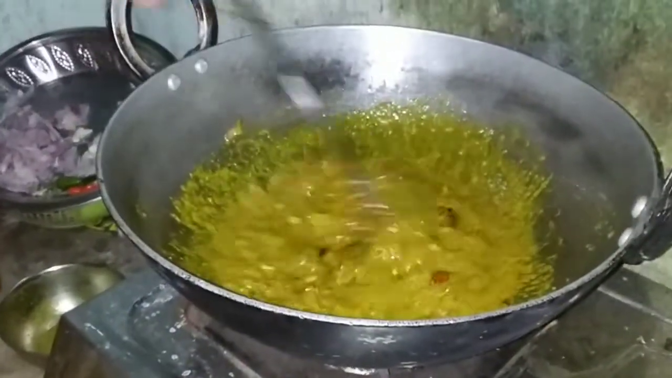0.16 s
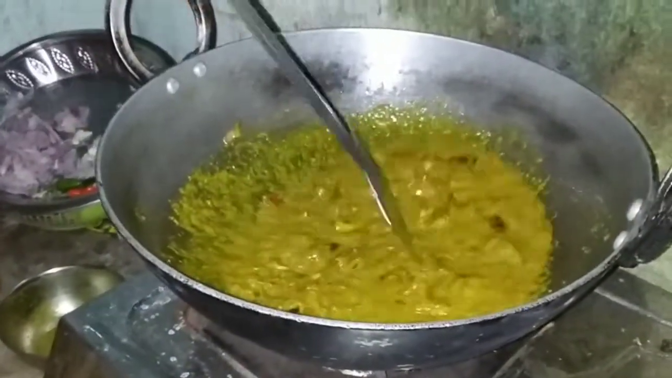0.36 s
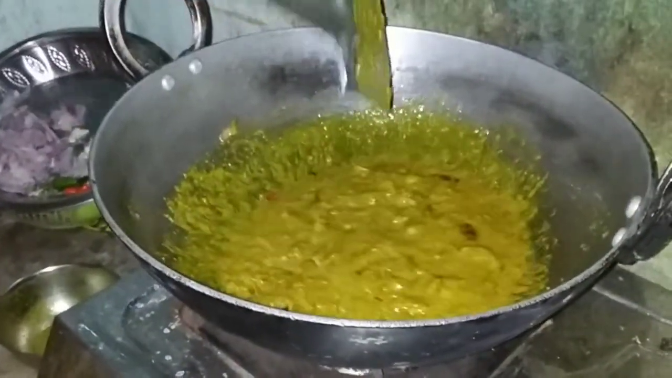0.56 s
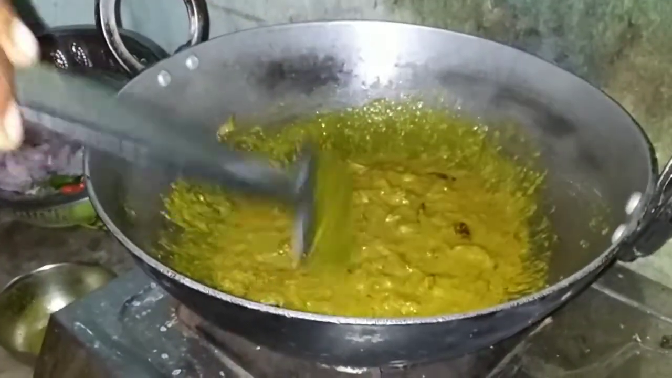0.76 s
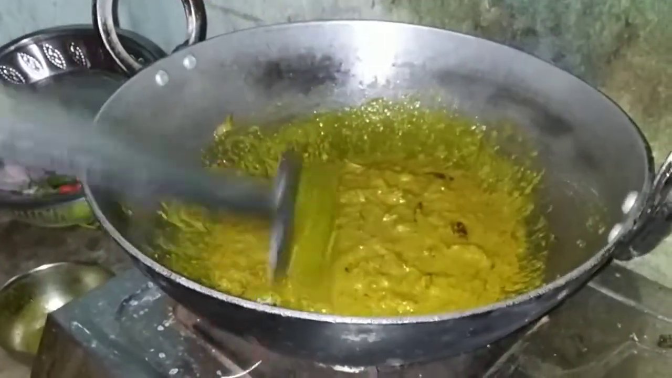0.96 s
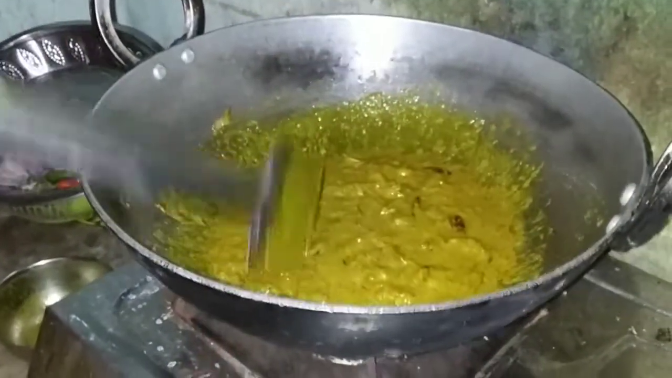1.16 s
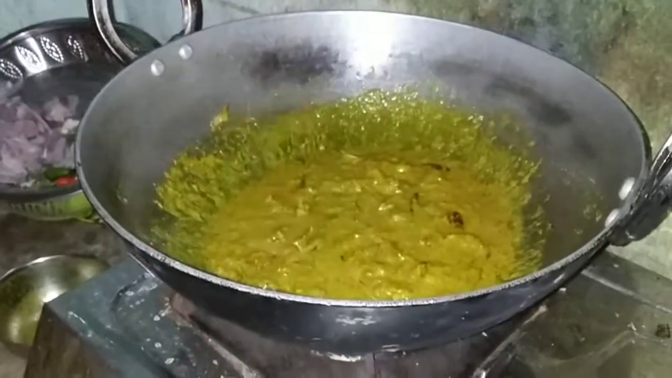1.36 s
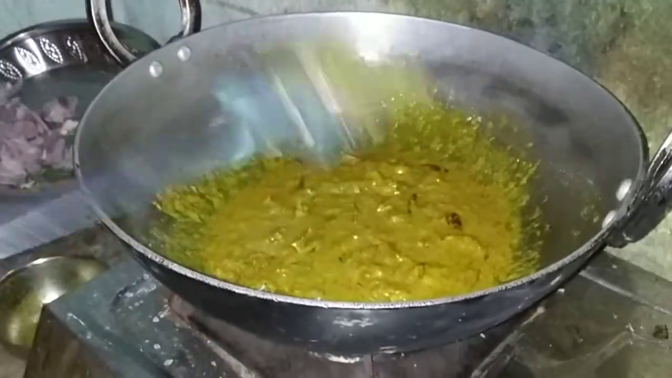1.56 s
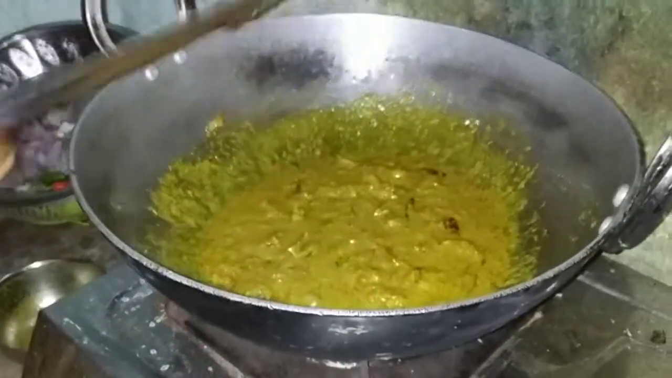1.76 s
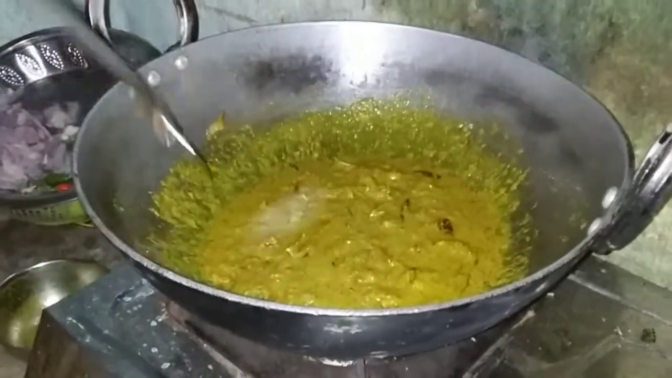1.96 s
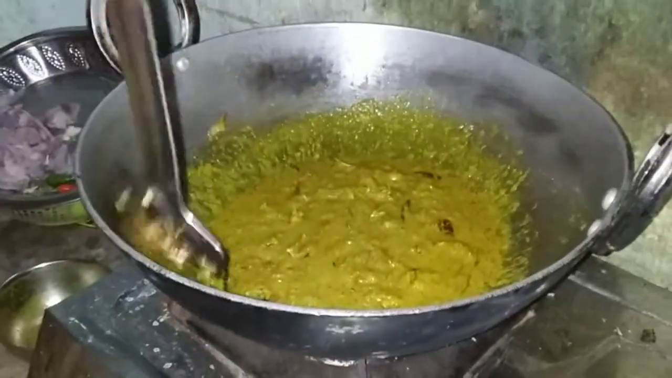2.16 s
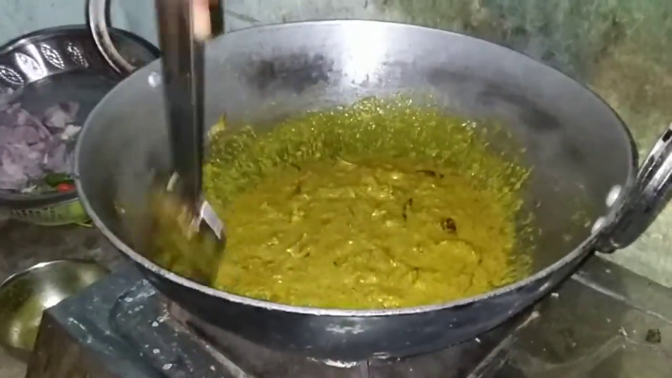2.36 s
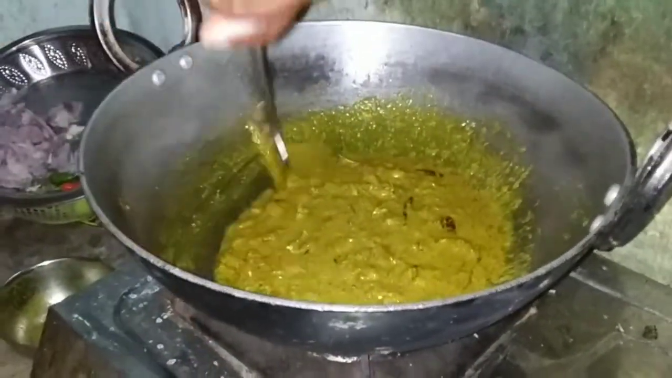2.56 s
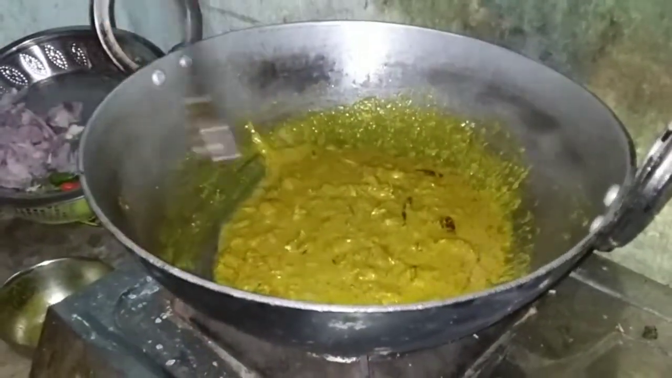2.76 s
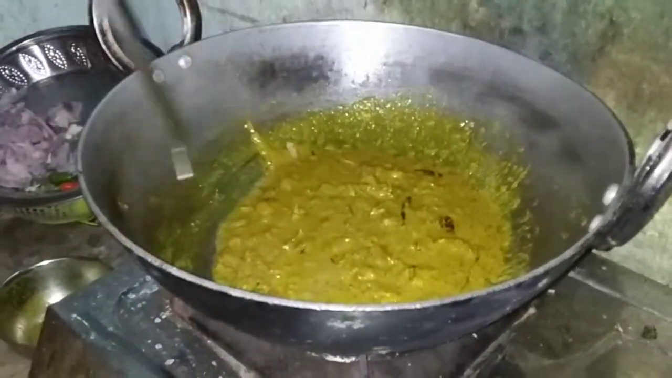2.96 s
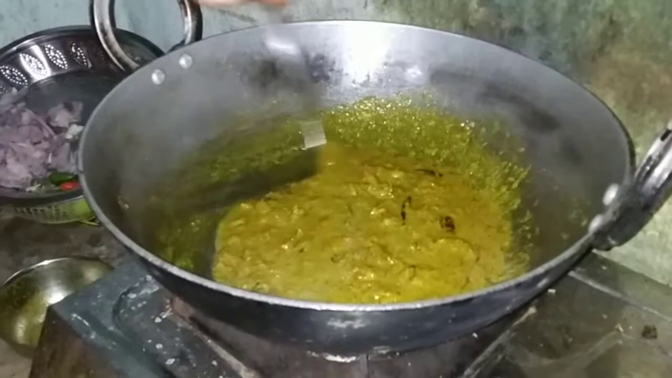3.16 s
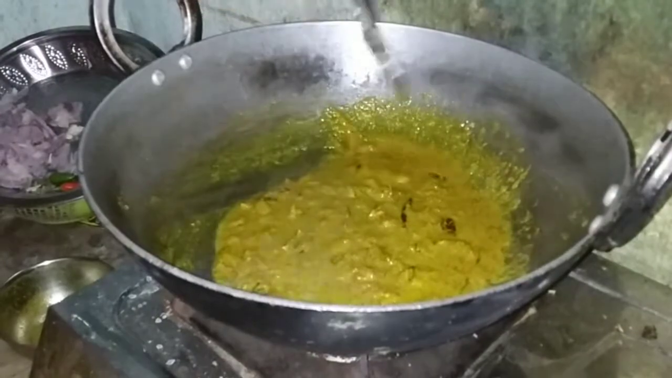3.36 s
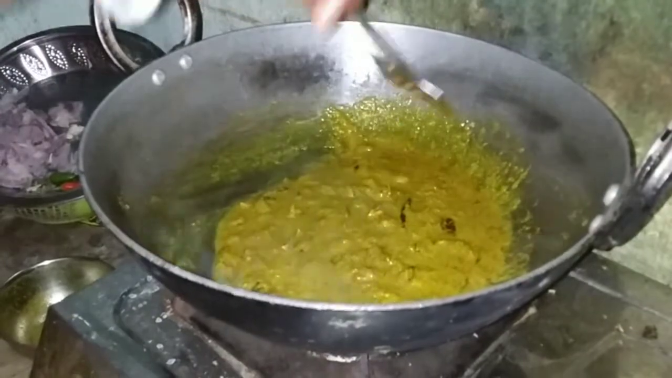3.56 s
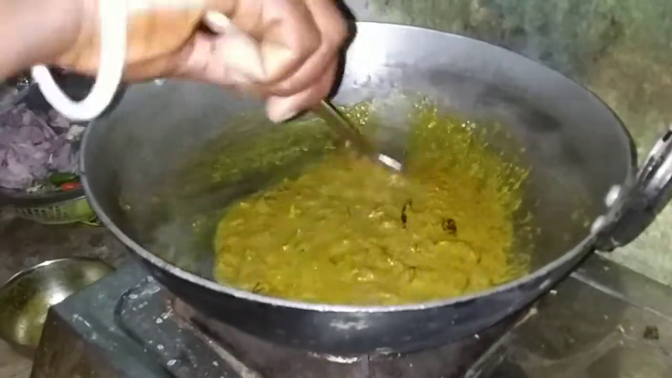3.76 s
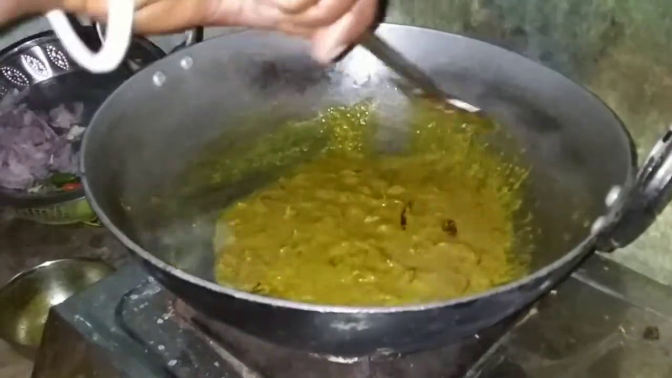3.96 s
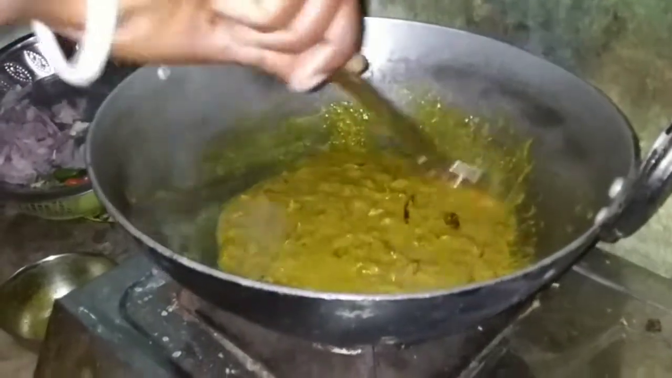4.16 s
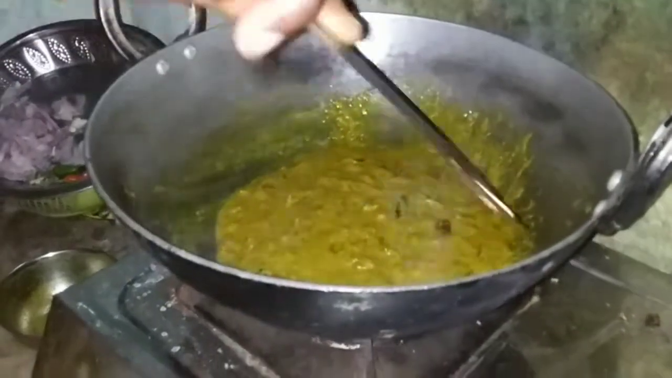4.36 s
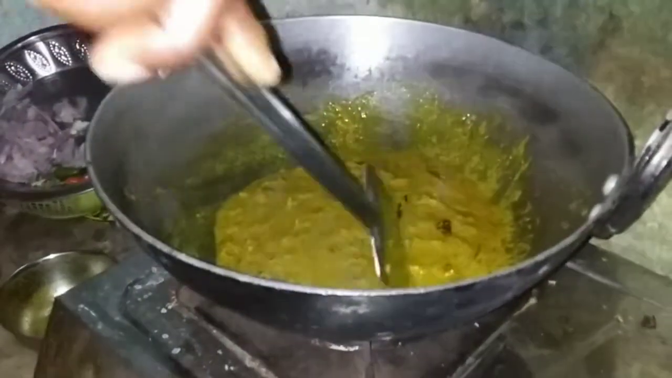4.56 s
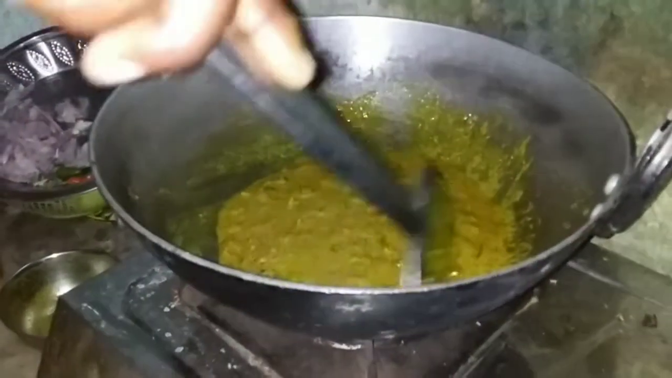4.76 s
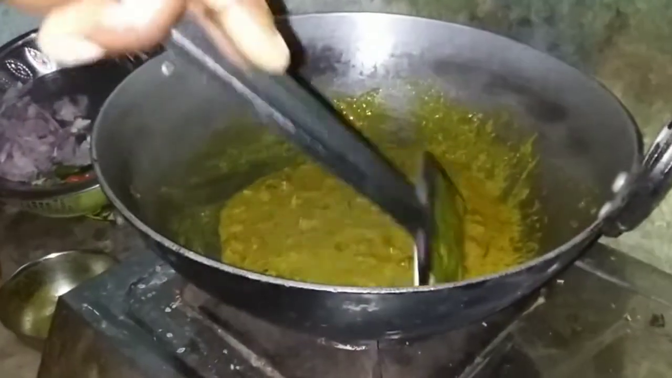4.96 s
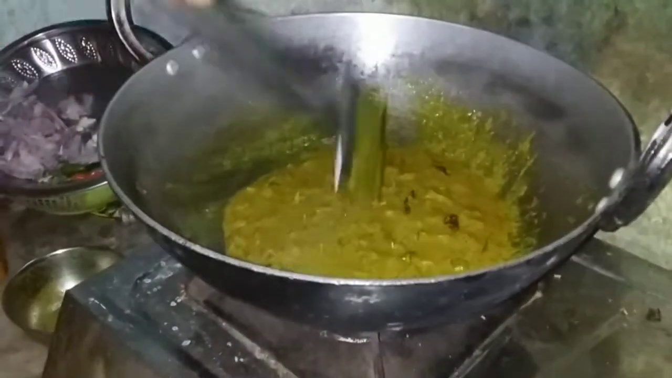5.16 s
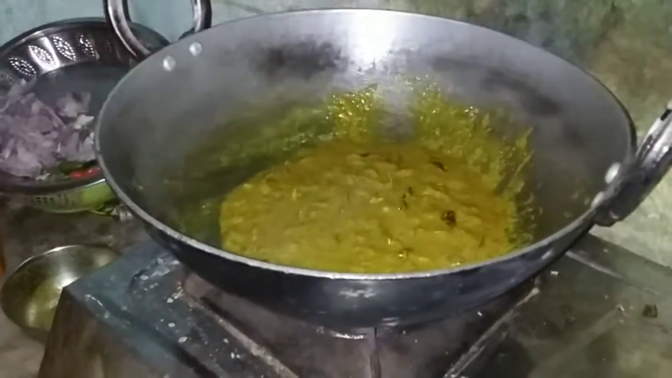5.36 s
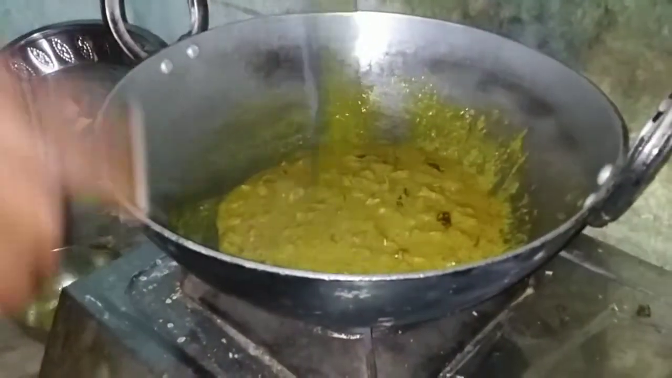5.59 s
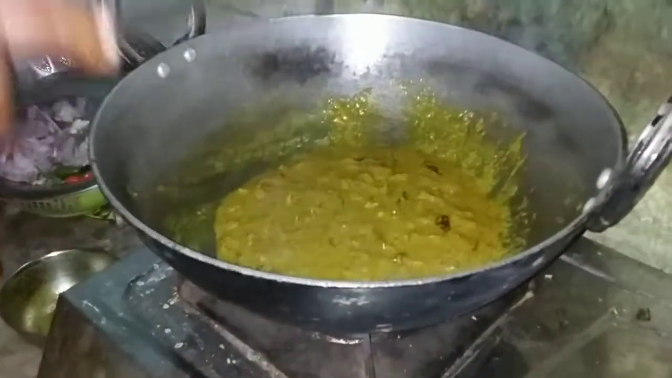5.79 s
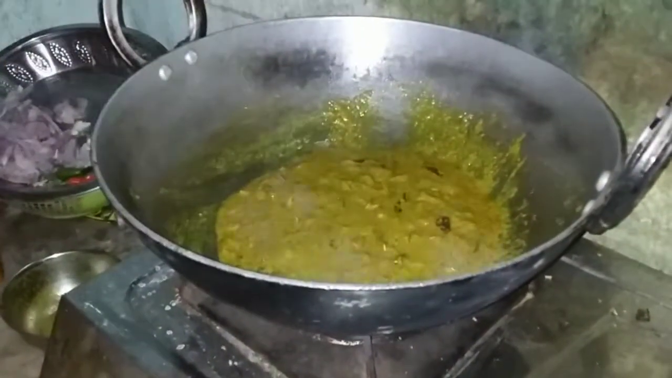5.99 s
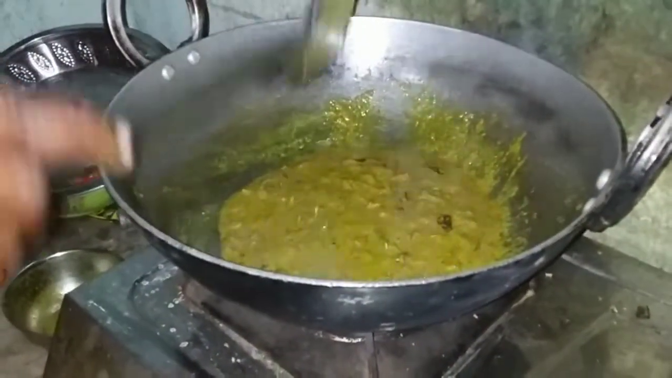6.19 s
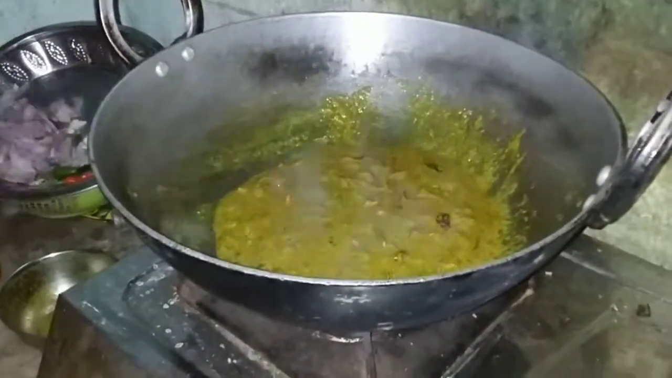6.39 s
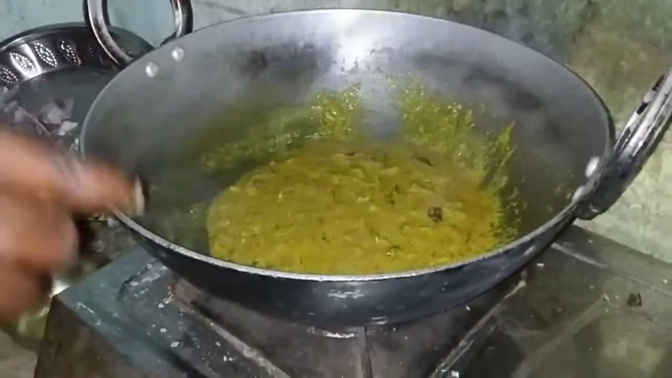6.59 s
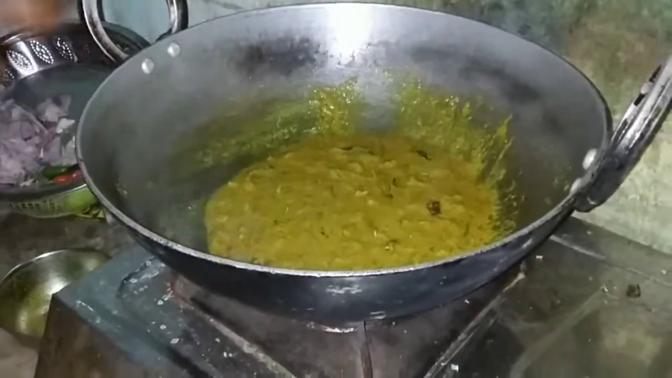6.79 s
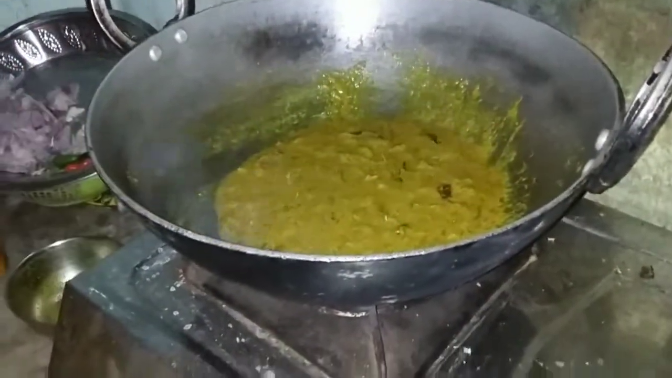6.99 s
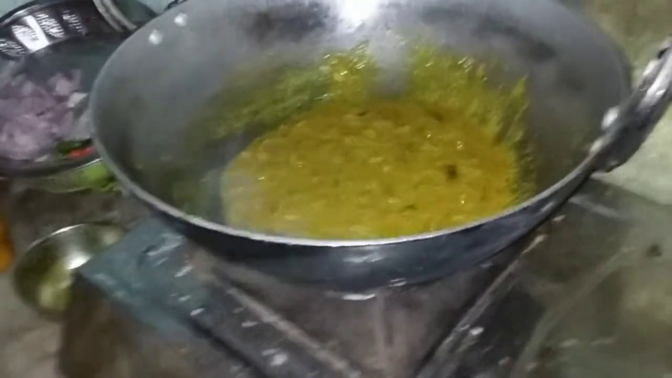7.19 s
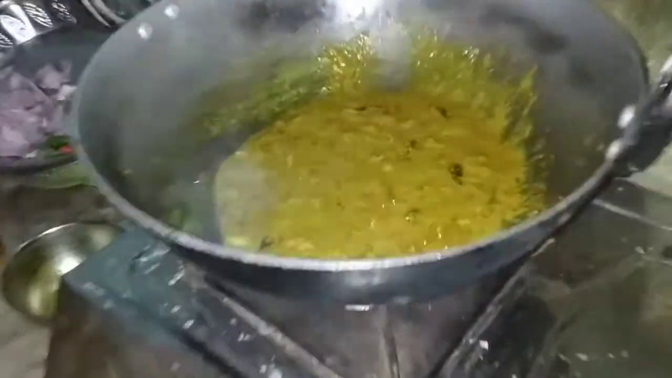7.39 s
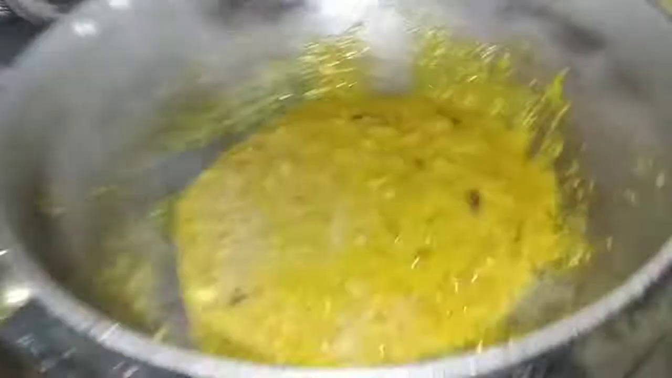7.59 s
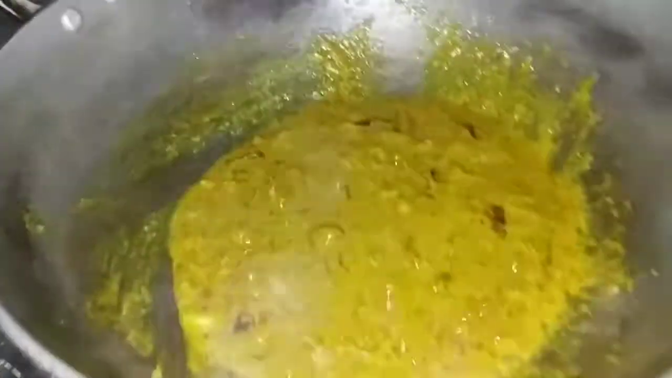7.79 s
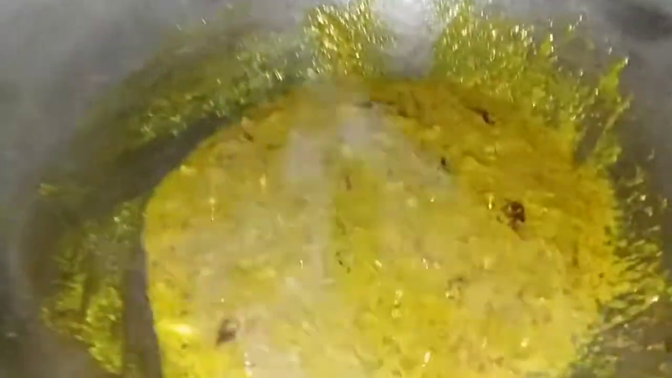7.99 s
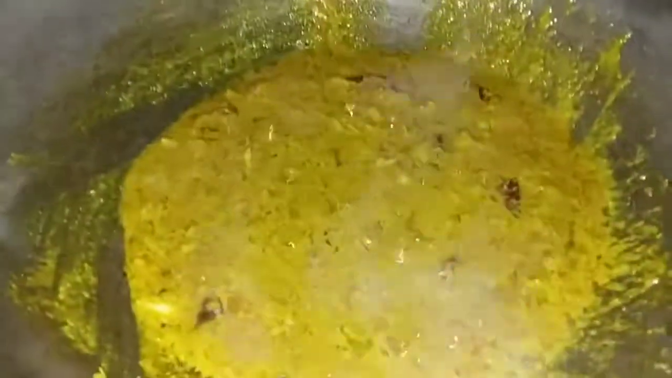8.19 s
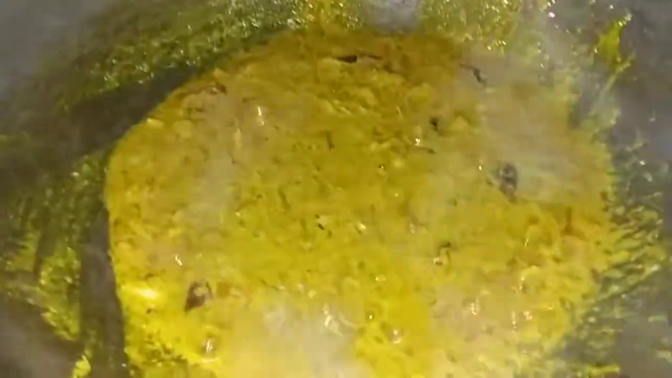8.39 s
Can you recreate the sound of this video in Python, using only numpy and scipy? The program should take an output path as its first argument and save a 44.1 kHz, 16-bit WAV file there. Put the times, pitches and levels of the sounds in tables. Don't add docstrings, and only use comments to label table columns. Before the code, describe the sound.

A close, dry kitchen sound with very little room echo. A low burner rumble flutters throughout, slightly stronger at first, with a thin distant motor hum and quiet steam hiss. A high oil sizzle pops at 0.1 s. A steel spatula strikes the pan wall loudly at 0.7, 0.85 and 1.05 s, each knock trailing a brief gritty scrape and slight ring; wet lumps slap around 1.1-1.3 s. Flatter landings at 2.15 and 2.8 s lead into longer scrapes, the first swelling late. A duller, heavier rim knock comes at 3.55 s, then strokes at 4.05, 4.35, 4.7 (very loud) and 4.95 s. From 5.1 s stirring stops: tiny sharp oil ticks, hollow bubble plops and dry paste snaps multiply, with a loud spit at 5.6 s. From 7.5 s the simmer and hiss swell closer until the end at 8.4 s, with low handling thumps around 8.14 and 8.34 s.

```python
import sys
import numpy as np
from scipy import signal
from scipy.fft import rfft, irfft
from scipy.io import wavfile
from scipy.ndimage import uniform_filter1d

SR = 44100
rng = np.random.default_rng(int(sys.argv[2]) if len(sys.argv) > 2 else 0)


def digitize_waveform(pressure):
    field = np.atleast_2d(pressure).T
    bounded = np.clip(field, -1, 1)
    quanta = np.round(bounded * 32767).astype(np.int16)
    wavfile.write(sys.argv[1], SR, quanta)


def gain_from_db(level_db):
    decades = np.asarray(level_db, float) / 20
    return 10 ** decades


N = 372204
TIME = np.arange(N) / SR
FREQ = np.maximum(np.fft.rfftfreq(N, 1 / SR), 1)

# (frequency [Hz], level [dB])
BURNER_COLOUR = [(9, -43.5), (15, 3), (32, -5), (46, -2.5), (54, -4), (102, -14), (146, -16), (178, -31.5),
                 (200, -17), (260, -42.5), (440, -120)]
# (frequency [Hz], width [Hz], level [dB])
MOTOR_HUM = [(612.7, 8.2, -2), (1628, 43, -6)]
# (frequency [Hz], balance [dB])
PORT_BALANCE = [(60, 1), (110, -0.5), (200, 0), (380, 0.5), (700, -1), (1290, 4.5), (2380, 5), (4400, 0.5),
                (8120, -4.5), (15000, 14.5)]
# (frequency [Hz], likeness [0-1])
PORT_LIKENESS = [(60, 0.94), (180, 0.87), (350, 0.9), (700, 0.6), (1400, 0.1), (3000, 0), (15000, 0.11)]

# (time [s], level [dB], oil sputter [dB])
SIMMER = [(0, -54, -1), (.46, -59, 1.5), (.62, -57, -4.5), (1.42, -58, 9), (1.61, -58.5, -2),
          (2.1, -55.5, -4.5), (2.6, -50.5, -2), (2.78, -54.5, 2), (3.3, -51.5, 2.5), (3.45, -54.5, -1),
          (3.85, -52.5, 1.5), (4.6, -51, -2.5), (5.16, -52, -2.5), (5.5, -49.5, -7), (6.13, -50.5, -2.5),
          (7.5, -48, -1), (7.85, -45.5, -0.5), (8.44, -43.5, -1.5)]
SIMMER_EDGES_HZ = [110, 700, 4000, 9000, 16500]
# (frequency [Hz], level per Hz [dB])
STEAM_COLOUR = [(59, -27.5), (100, -3), (427, -1.5), (602, -5), (684, -15.5), (903, -14.5), (1350, -15),
                (1610, -15), (1950, -15.5), (2520, -17), (5320, -18.5), (9070, -18.5), (12800, -19),
                (15500, -28.5), (16500, -59.5)]
# (level at a simmer of -53 [dB], follows level [dB/dB], follows sputter [dB/dB])
SIMMER_ANSWER = [(-58, 1, .01), (-58, 1, .01), (-62.5, 1, 0.35), (-59, 1, 0.74)]

# (time [s], peak [dB], pitch [Hz], left minus right [dB])
OIL_SPITS = [(5.1572, -36, 13100, 7.0), (5.1981, -41, 11800, 4), (5.3193, -42, 11600, 4.0),
             (5.3742, -47, 12800, 4), (5.5318, -51, 14200, 1), (5.5767, -27.5, 11100, 11),
             (5.5782, -25.5, 10900, 1.5), (5.7065, -38, 12700, 5), (5.7424, -35, 13600, 5),
             (5.9274, -32, 9570, 6), (5.9409, -30, 11600, 8), (6.0592, -40, 11000, 7.0),
             (6.1105, -40, 12000, 6.0), (6.2472, -24, 11100, 1), (6.3405, -36, 12500, 3),
             (6.4692, -34, 10900, 2), (6.4937, -34, 12800, 5), (6.6214, -42, 14700, 1),
             (6.6548, -36, 12700, 6.5), (6.7286, -45, 13100, 0), (6.8274, -32, 11700, 11),
             (6.9676, -37, 12300, 5.5), (7.0674, -39, 12600, 2), (7.1866, -32.5, 11600, 5),
             (7.3422, -46, 13500, 0), (7.5193, -35, 10500, 3), (7.5358, -35, 13200, 1),
             (7.5797, -26, 10400, -5), (7.6181, -27, 8000, 1), (7.655, -31, 9000, 5.5),
             (7.7787, -33, 9510, 8), (7.8745, -29, 9900, 7.0), (7.886, -30, 13200, 10),
             (7.9469, -29, 13000, 6.0), (8.0526, -48, 10100, -4), (8.2582, -28, 13300, 8),
             (8.346, -30, 10900, 0),
             (0.0094, -46, 11400, 8), (0.2314, -48, 12100, 5.0), (0.3034, -38, 13900, 1),
               (0.4384, -45, 12200, 9), (0.795, -22, 10900, -2), (1.995, -36, 7400, 8),
               (2.732, -34, 11100, -2), (3.2853, -39, 12700, 2), (3.3283, -27, 11550, 2),
               (3.364, -26.5, 10300, -2), (3.829, -45, 11200, 22)]
# (time [s], peak [dB], pitch [Hz], left minus right [dB])
PLOPS = [(5.6163, -30, 1820, 0), (5.7627, -36, 1740, -4), (5.937, -38, 2880, -1), (6.167, -31.5, 1740, 4),
         (6.4666, -39, 2300, 8), (6.507, -40.5, 1870, 12), (6.598, -37, 1780, 6.5), (6.815, -36, 2550, -3),
         (6.8889, -43, 2270, -5), (6.9933, -40, 1640, 0), (7.0794, -35.5, 3400, -3), (7.2725, -43, 2180, 0),
         (7.3076, -36, 2920, 7), (7.4097, -35.5, 1840, 1), (7.5359, -39.5, 2860, -14),
         (7.6197, -37, 1840, 0), (7.6598, -29.5, 1680, 0), (7.726, -38, 1740, 3.5), (7.7739, -35, 1740, -5),
         (7.8706, -36, 2440, 5), (8.0308, -37, 1740, 6), (8.1001, -48, 1830, -6), (8.284, -36, 1110, -6),
         (8.4099, -33, 2630, -1)]
# (time [s], peak [dB], pitch [Hz], left minus right [dB])
SINGING_DROPS = [
    (0.119, -23, 11100, -1),
    (5.579, -24.5, 10640, 4),
    (5.94, -35, 11640, 3.5),
    (6.248, -29, 10800, 9),
]
# (time [s], peak [dB], pitch [Hz], left minus right [dB])
SPLATS = [(1.1344, -25, 1380, 11), (1.1967, -28.5, 3100, 9), (1.225, -38, 1210, 1), (1.2476, -37, 3000, 9),
          (1.272, -35.5, 1100, 3), (2.7544, -59, 1580, 4), (3.2116, -37, 1620, -8), (4.6653, -39, 1640, -1),
          (5.2794, -45, 1210, 2.5), (6.6548, -33.5, 7350, -12), (7.8171, -30.5, 2750, 7.5),
          (8.0606, -32, 2680, 11)]
# (time [s], peak [dB], pitch [Hz], left minus right [dB])
SNAPS = [(5.1527, -34, 5790, 6), (5.3742, -32, 2640, 9), (5.7634, -26, 1850, 14), (6.1354, -32, 3390, 8),
         (6.6544, -35, 6000, 2.0), (6.674, -29.5, 1490, 2), (6.995, -29, 1860, 9), (7.0788, -30, 3530, 4),
         (7.234, -23.5, 2520, 9.5), (7.281, -32, 1710, -5), (7.5128, -34, 3600, 5), (7.5367, -28, 2860, 6),
         (7.6879, -24, 2930, 5), (7.774, -34, 1880, 3), (7.816, -40, 2870, 3), (8.0143, -25, 1680, -6),
         (8.0586, -40, 3160, -4), (8.2227, -33, 2480, -6)]
# (time [s], peak [dB], pitch [Hz], left minus right [dB])
BUMPS = [
    (8.138, -21.5, 233, -4.5),
    (8.147, -25, 149, -1),
    (8.338, -24, 303, -2),
    (8.351, -27, 318, -2),
]

# (time [s], peak [dB], body against treble [dB],
# 2-4.5 kHz against treble [dB], rise [s])
KNOCKS = [
    (0.665, -3.5, -2, -12, 0.00026),
    (0.853, -1.5, -4, -6.5, 0.0008),
    (1.051, -3, -7, -9.5, 0.00033),
    (2.1467, -6.5, -17, -11, 0.012),
    (2.814, -4, -15, -16, 0.004),
    (3.5375, -11.5, 10, -4, 0.001),
    (4.04, -8, 1, -12, 0.0014),
    (4.356, -4, -2, -6, 0.0025),
    (4.699, -0.5, -4, -14.5, 0.00056),
    (4.952, -2.5, -8, -4.5, 0.00027),
]
# (time [s], pressure [dB], how flat it lies [dB])
STROKES = [
    [(0.69, -25, 3.5), (0.71, -26, 0.5), (0.79, -50, 2.5), (0.8, -47, -3.5), (0.818, -67, 14),
     (0.84, -42, 1)],
    [(0.875, -32, -7), (0.897, -22, -6), (0.999, -52, 10), (1.04, -63, 0.5)],
    [(1.075, -20, -7), (1.091, -22, -5.5), (1.229, -59, 14.5), (1.3, -65.5, 15.5)],
    [(2.19, -32.5, -4), (2.216, -38.5, -14), (2.26, -21, -21.5), (2.414, -13, -20.5), (2.454, -18, -11),
     (2.52, -54.5, 6.5)],
    [(2.845, -28.5, -3.5), (2.869, -30, -10), (2.905, -20.5, -26.5), (3.111, -21, -4), (3.169, -52, -6.5),
     (3.2, -54.5, -2)],
    [(3.562, -47, 9.5), (3.628, -13.5, -18.5), (3.644, -15.5, -14.5), (3.704, -28, -11),
     (3.718, -32.5, -10.5), (3.76, -55.5, -8.5)],
    [(4.058, -32, 3), (4.08, -18.5, -19), (4.12, -14, -11), (4.142, -10.5, -16.5), (4.16, -17.5, -16.5),
     (4.2, -52, -23)],
    [(4.375, -23, -4.5), (4.387, -26.5, -1), (4.471, -22.5, -6), (4.52, -51, -4)],
    [(4.715, -18, -4), (4.737, -25.5, -5), (4.793, -29, -7.5), (4.819, -52, -0.5), (4.85, -49.5, 0)],
    [(4.97, -14.5, -5.5), (5.004, -20, -10), (5.074, -54.5, 0), (5.08, -69, -8)],
]
STEEL_EDGES_HZ = [120, 700, 2000, 4500, 16500]
# (frequency [Hz], level per Hz [dB])
STEEL_COLOUR = [(59, -48), (100, 1.5), (245, -4.5), (699, -7), (1380, -7), (3780, -4), (5670, 4),
                (12000, 0.5), (15500, -10.5), (16500, -54)]
# (share of flatness [0-1], dies after the lift [dB/s])
WALL_ANSWER = [(1, 417.5), (0.5, 459.5), (0.22, 500.5), (0.0092, 549)]
# (lowest [dB], second [dB], third [dB])
STROKE_TONES = [(.1, -4.5, -2), (.1, -5, -2.5), (.1, -2, -2), (.1, -7, -6), (.1, -6, -5.5), (.1, -0.7, -8),
                (.1, -2.5, -4), (.1, -3.5, -1.5), (.1, -3, -5.5), (.1, -6, -3.5)]
# (frequency [Hz], level [dB], T60 [s])
THUDS = [
    [(277, -22, 0.038), (1010, -23, 0.015), (2777, -13, 0.013)],
    [(302, -36, 0.023), (900, -17.5, 0.013), (1900, -24, 0.0095)],
    [(818, -17, 0.012), (305, -20.5, 0.033), (2570, -6, .012)],
    [(1780, -45, .02), (2800, -25, .012)],
    [(1960, -20, .02), (300, -34.5, .04)],
    [(289, -21.5, .04), (630, -21, .05), (1057, -8, 0.023)],
    [(567, -20.5, 0.09), (1100, -19, .015), (1870, -14, .012)],
    [(1080, -15.5, 0.013), (553, -22, .02)],
    [(946, -17, .015), (1800, -16, 0.015), (398, -18, .02)],
    [(930, -9, 0.015), (1700, -11.5, .012), (398, -21.5, 0.025)],
]
# (time [s], level [dB])
BLADE_RINGS = [
    (.69, -26.5),
    (0.883, -22),
    (1.085, -29),
    (4.45, -35.5),
    (4.72, -33),
    (4.97, -32),
]
# (frequency [Hz], width [Hz], level [dB])
NEAR_WALL = [(300, 120, -1.5), (5320, 260, 10.5), (587, 70, 3), (1294, 3.1, 0.5), (2780, 160, 1),
             (4370, 57, 12.5), (4930, 90, -9.5), (6470, 250, -26), (7160, 50, -23), (7800, 38, -8.5),
             (8320, 210, 3.5), (10200, 620, -3), (10500, 100, -46.5), (12000, 49, 1)]
# (frequency [Hz], width [Hz], level [dB])
LEFT_WALL = [(342, 67, -3.5), (543, 51, 0.5), (1100, 110, -9), (4200, 11.3, 0.5), (4144, 38, 4),
             (5950, 57, 0.5), (5700, 170, 0), (6000, 160, -17), (8580, 42, 0), (8900, 260, -5.5),
             (9600, 170, -10.5), (11100, 370, -14), (12000, 180, -6)]
# (frequency [Hz], width [Hz], level [dB])
FAR_WALL = [(316, 47, 8.5), (565.0, 50, 13.5), (1119, 170, 1.5), (1380, 42, 0.5), (2550, 56, 8.0),
            (4136, 93, 9.5), (5170, 140, -4), (5600, 77, 11.0), (6500, 45, 2), (8400, 170, -1.5)]
# (frequency [Hz], width [Hz], level [dB])
RIM_WALL = [(580, 61, 15), (1016, 130, 6), (1270, 81, -5), (2500, 70, 4), (5660, 150, 20.5), (6300, 81, 1),
            (12000, 550, -3.5)]
PLACES = [NEAR_WALL] * 3 + [LEFT_WALL] * 2 + [RIM_WALL] + [FAR_WALL] * 2 + [NEAR_WALL] * 2


def unit(x):
    return x / np.sqrt(np.mean(x ** 2))


def along(table):
    hz, value = np.transpose(table)
    return np.interp(np.log(FREQ), np.log(hz), value)


def walk(rate, size=N):
    k = int(SR / rate)
    held = np.repeat(rng.standard_normal(size // k + 2), k)
    return unit(uniform_filter1d(uniform_filter1d(held, k), k)[:size])


def pair(colour):
    like = np.clip(along(PORT_LIKENESS), 0, 1)
    noise = rfft(rng.standard_normal((2, N)))
    mid, side = noise * gain_from_db(along(colour)) * np.sqrt([1 + like, 1 - like])
    return unit(irfft([mid + side, mid - side], N))


def ring(x, hz, width):
    r = np.exp(-np.pi * width / SR)
    return signal.lfilter([1, 0, -1], [1, -2 * r * np.cos(2 * np.pi * hz / SR), r * r], x)


def kitchen():
    hum = sum(gain_from_db(db) * unit(ring(rng.standard_normal(N), hz, width)) for hz, width, db in MOTOR_HUM)
    settling_db = 2.7 * np.exp(-TIME / 1.4)
    flutter_db = 1.5 * walk(5)
    return gain_from_db(-46.5 + settling_db + flutter_db) * pair(BURNER_COLOUR) + gain_from_db(-65.5) * hum


def bands(x, edges_hz):
    size = x.shape[1]
    octave = np.log2(np.maximum(np.fft.rfftfreq(size, 1 / SR), 1))
    above = [np.clip(0.5 + 2 * (octave - np.log2(hz)), 0, 1) for hz in edges_hz[:4]] + [0]
    spectrum = rfft(x)
    return [unit(irfft(spectrum * (above[k] - above[k + 1]), size)) for k in range(4)]


def grit(rate, spread_db, smear_s):
    size_db = spread_db * np.minimum(rng.exponential(size=N), 3)
    hits = (rng.random(N) < rate / SR) * gain_from_db(size_db)
    return unit(signal.lfilter([1], [1, -np.exp(-1 / (smear_s * SR))], hits))


def simmer():
    s, level_db, sputter_db = np.transpose(SIMMER)
    bubbling = grit(90, 3.5, 0.004)
    spitting = grit(70, 5.0, 0.0045)
    grains = (1, 1 + 0.5 * bubbling, 1 + 0.5 * bubbling + 0.3 * spitting, 1 + 0.6 * spitting)
    out = np.zeros((2, N))
    hiss = bands(pair(STEAM_COLOUR), SIMMER_EDGES_HZ)
    for band, (db, by_level, by_sputter), grain in zip(hiss, SIMMER_ANSWER, grains):
        band_db = np.interp(TIME, s, db + by_level * (level_db + 53) + by_sputter * sputter_db)
        patches_db = 1.0 * walk(17)
        out += gain_from_db(band_db + patches_db) * grain * band
    return out


def bursts(events, rise_s, t60, glide, noisy, width):
    out, t = np.zeros((2, N + 4096)), np.arange(4096) / SR
    for (s, db, hz, pan_db), turn in zip(events, rng.random((len(events), 2, 1))):
        cycles = hz * t * (1 + glide * t / t60) + turn * min(hz / 3000, 1)
        tone = np.sqrt(2) * np.sin(2 * np.pi * cycles)
        shared, own = rng.standard_normal((2, len(t)))
        noise = shared + min(hz / 1500, 3) * own * [[1], [-1]]
        puff = unit(ring(noise, min(hz, 15000), width * hz))
        port_db = np.array([[pan_db], [-pan_db]]) / 2
        shape = gain_from_db(db - 60 * t / t60 + port_db) * np.minimum(t / rise_s, 1)
        start = int(s * SR)
        out[:, start:start + len(t)] += shape * ((1 - noisy) * tone + noisy * puff)
    return out[:, :N]


def oil_spits():
    return bursts(OIL_SPITS, rise_s=0.0004, t60=0.012, glide=0.001, noisy=0.9, width=0.45)


def small(count, over_db, spread_db, low_hz, high_hz):
    s, size, pitch, pan = rng.random((count, 4)).T
    s = (np.arange(count) + s) / count * N / SR
    simmer_db = np.interp(s, *np.transpose(SIMMER)[:2])
    db = simmer_db + over_db - spread_db * np.log(1 - 0.95 * size)
    return list(zip(s, db, low_hz * (high_hz / low_hz) ** pitch, 16 * (pan - 0.5)))


def bubble_plops():
    little = small(count=130, over_db=-1, spread_db=4.0, low_hz=1210, high_hz=3120)
    return bursts(PLOPS + little, rise_s=0.00082, t60=0.034, glide=0.15, noisy=0.43, width=1.0)


def singing_drops():
    return bursts(SINGING_DROPS, rise_s=0.002, t60=0.057, glide=0.001, noisy=0.57, width=0.2)


def scatter(x, t60, unlike_hz):
    t = np.arange(SR // 3) / SR
    shared, own = rng.standard_normal(len(t)), rng.standard_normal((2, len(t)))
    treble = signal.butter(2, unlike_hz, "high", fs=SR, output="sos")
    modes = shared + signal.sosfilt(treble, own - shared)
    return signal.fftconvolve(x, modes * gain_from_db(-60 * t / t60), axes=1)[:, :x.shape[1]]


def wall(force, modes, modes_db, moving_db):
    size = force.shape[1]
    turn = 1.17 * walk(14.0, size)
    fine = np.cos(turn) * scatter(force[[0, 0]], 0.15, 510)
    fine = fine + np.sin(turn) * scatter(force[[1, 1]], 0.072, 730)
    strong = 0
    for hz, width, db in modes:
        level = gain_from_db(db + moving_db * walk(19.75, size))
        strong = strong + level * unit(ring(force, hz, width)) * np.sqrt(width)
    return unit(fine) + gain_from_db(modes_db) * unit(strong)


def even(x, size):
    return unit(x / (0.1 + uniform_filter1d(np.mean(x ** 2, axis=0), size)) ** 0.4)


def knock_and_scrape(force, slips, time, knock, stroke, modes, tone_db):
    hit_s, hit_db, heavy_db, edge_db, rise_s = knock
    s, press_db, flat_db = np.transpose(stroke)
    t = np.maximum(time - hit_s, 0)
    after, lifted = np.maximum(t - rise_s, 0), np.maximum(time - s[-1], 0)
    steel = bands(wall(force, modes, modes_db=-3.5, moving_db=3.5), STEEL_EDGES_HZ)
    drags_db = (*tone_db, 0)
    knocks_db = (heavy_db - 18.5, heavy_db - 4.5, edge_db, 0)
    slowness = (2.2, 1.4, 1.3, 1.21)
    out = np.zeros_like(force)
    for band, (share, fall), drag_db, knock_db, slow in zip(steel, WALL_ANSWER, drags_db, knocks_db, slowness):
        band = even(band, size=1500) * gain_from_db(1.42 * walk(34.9, len(t)))
        level_db = drag_db + np.interp(time, s, press_db + share * flat_db) - fall * lifted
        drag = np.clip(t / 0.05, 0, 1) * gain_from_db(uniform_filter1d(level_db, size=300) + 1.0) * slips
        body = gain_from_db(-60 * after / (slow * 0.035))
        chatter = 0.74 * gain_from_db(-60 * after / (slow * 0.0091))
        crack = (body + chatter) * np.minimum(t / rise_s, 1)
        blow = np.sqrt(np.sum((band * crack) ** 2) / np.sum(2 * crack ** 2))
        out += band * (drag + gain_from_db(hit_db + knock_db - 8.5) * crack / blow)
    return out


def landing_thud(time, knock, thud):
    hit_s, rise_s = knock[0], knock[-1]
    t = np.maximum(time - hit_s, 0)
    after = np.maximum(t - rise_s, 0)
    out = np.zeros((2, len(t)))
    for (hz, db, t60), turn in zip(thud, rng.random((len(thud), 2, 1))):
        level = gain_from_db(db - 60 * after / np.clip(t60, 0.008, 0.06)) * np.minimum(t / rise_s, 1)
        out += level * np.sin(2 * np.pi * (hz * t + turn * min(hz / 4000, 1)))
    return out


def blade_ring():
    level = 0
    for s, db in BLADE_RINGS:
        decay = gain_from_db(db - 60 * np.maximum(TIME - s, 0) / 0.25)
        level = level + decay * np.clip((TIME - s) / 0.0098, 0, 1)
    return level * np.sin(2 * np.pi * 1370 * TIME) * [[1.2], [0.8]]


def spatula():
    force = pair(STEEL_COLOUR)
    slips = 0.53 + 0.042 * grit(1100, 1, 0.00059) + 0.093 * grit(160, 1.6, 0.0015)
    slips = slips * gain_from_db(1.8 * walk(60))
    out = np.zeros((2, N))
    for knock, stroke, modes, tone_db, thud in zip(KNOCKS, STROKES, PLACES, STROKE_TONES, THUDS):
        start = int((knock[0] - 0.05) * SR)
        span = slice(start, start + 24576)
        out[:, span] += knock_and_scrape(force[:, span], slips[span], TIME[span], knock, stroke, modes, tone_db)
        out[:, span] += landing_thud(TIME[span], knock, thud)
    rocking = unit(ring(out.mean(axis=0), 247, 4.7)) * gain_from_db(-60)
    return out + rocking + blade_ring()


def paste_splats():
    return bursts(SPLATS, rise_s=0.00085, t60=0.035, glide=0.034, noisy=0.78, width=0.32)


def skin_snaps():
    return bursts(SNAPS, rise_s=0.0002, t60=0.006, glide=0.001, noisy=0.9, width=1.2)


def phone_bumps():
    return bursts(BUMPS, rise_s=0.0034, t60=0.083, glide=-0.094, noisy=0.65, width=0.37)


def scene():
    paste_and_oil = oil_spits() + bubble_plops() + singing_drops() + paste_splats() + skin_snaps()
    pan = spatula() + gain_from_db(1.0) * paste_and_oil
    room = signal.lfilter([0.3], [1, -0.7], scatter(pan, 0.28, 420))
    return kitchen() + simmer() + pan + gain_from_db(-40.0) * room + gain_from_db(1.0) * phone_bumps()


def top_cut(x):
    return signal.sosfilt(signal.butter(12, 16810, fs=SR, output="sos"), x)


def record(dry):
    port_db = np.outer([0.5, -0.5], along(PORT_BALANCE))
    ports = irfft(rfft(dry) * gain_from_db(port_db), N)
    rounded = np.tanh(1.2 * ports) / 1.2
    low_pass = signal.ellip(6, 0.3, 32, 15900, fs=SR, output="sos")
    mix = signal.sosfilt(low_pass, rounded)
    return top_cut(mix)


dry = scene()
out = record(dry)
digitize_waveform(out)
```